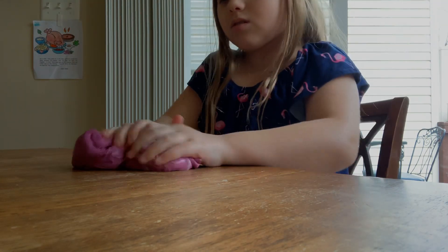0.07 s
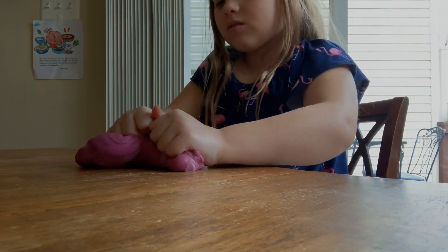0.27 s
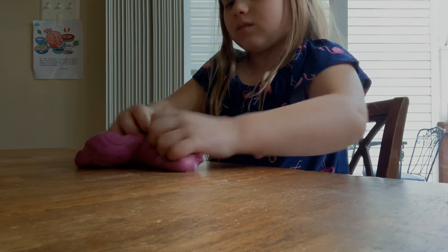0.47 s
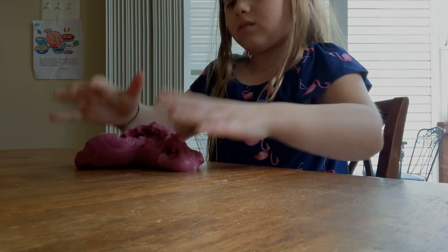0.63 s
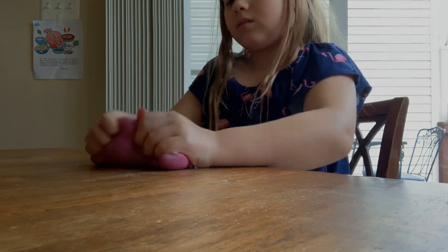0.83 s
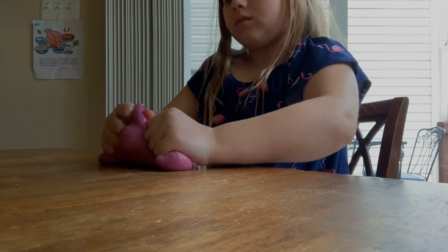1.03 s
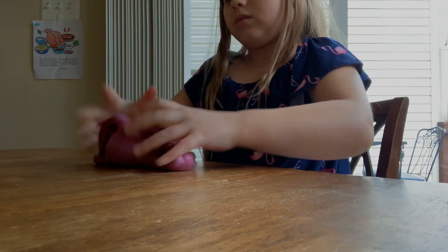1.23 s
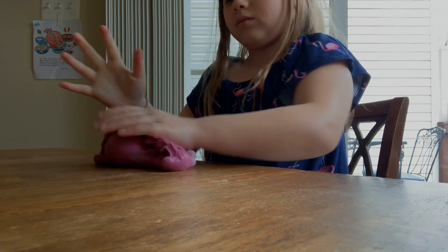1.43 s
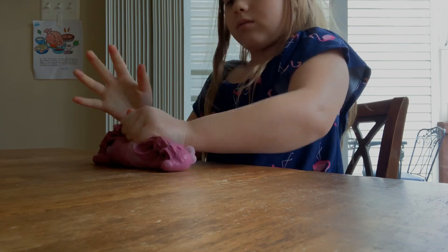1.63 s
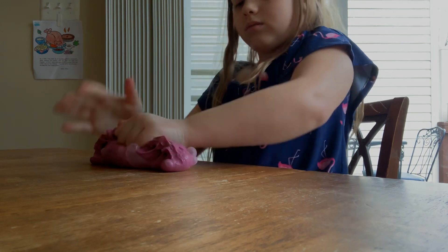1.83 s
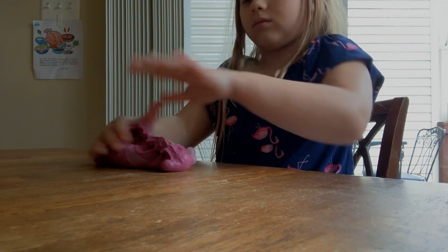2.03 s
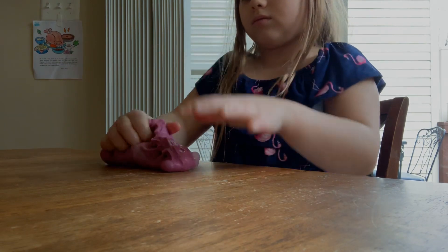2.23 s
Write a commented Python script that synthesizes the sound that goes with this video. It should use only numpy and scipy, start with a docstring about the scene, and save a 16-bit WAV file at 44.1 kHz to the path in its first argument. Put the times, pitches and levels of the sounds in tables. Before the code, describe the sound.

Air pockets burst in soft slime kneaded by hand, snapping and squelching in a quiet room

```python
"""Trapped air pockets burst as sharp pops while soft slime is folded and pressed by hand on a wooden table:
each burst is a pressure push, a cavity ringing a few cycles and a splutter of torn film.
Between them the sticky mass hisses, squelches and crackles in random grains; brief rough tones give
one tonal pop and then air squealing through slits. The furnished room answers with a bright noise tail
over its nearly steady hum; the recorder delays the lows behind the highs."""
import sys
import numpy as np
from scipy import signal
from scipy.fft import rfft, irfft, next_fast_len
from scipy.io import wavfile

SR = 44100
rng = np.random.default_rng(int(sys.argv[2]) if len(sys.argv) > 2 else 0)


def volts(x):
    """Linear amplitude factor 10**(x/20) for a level x in dB, scalar or array-like."""
    e = np.asarray(x, float) / 20
    return 10 ** e


def store_pcm(level_fs):
    """Save levels as 16-bit WAV."""
    pcm = np.round(np.clip(level_fs, -1, 1) * 32767).astype(np.int16)
    wavfile.write(sys.argv[1], SR, np.atleast_2d(pcm).T)


N = 101429


def at_hz(points, hz, index=1):
    """Reads a table column at hz, linear in log frequency."""
    points = np.array(points)
    return np.interp(np.log(np.maximum(hz, 1)), np.log(points[:, 0]), points[:, index])


def rms_one(x):
    """Scales x to rms 1."""
    return x / np.sqrt(np.mean(x ** 2) + 1e-20)


def colour(x, spectrum):
    """Filters x by the spectrum; rms 1."""
    gain = volts(at_hz(spectrum, np.fft.rfftfreq(N, 1 / SR)))
    return rms_one(irfft(rfft(x) * gain, N))


def drift(rate_hz):
    """Noise through two equal one-pole low-passes at rate_hz; rms 1."""
    r = np.exp(-2 * np.pi * rate_hz / SR)
    noise = rng.standard_normal(N + SR)
    return rms_one(signal.lfilter([1], [1, -2 * r, r * r], noise)[SR:])


def grains(per_s, spread_db):
    """Single-sample clicks at random times, of uneven size and either sign."""
    sizes = volts(spread_db * np.minimum(rng.exponential(1, N), 5))
    signs = rng.choice([-1, 1], N)
    return sizes * signs * (rng.random(N) < per_s / SR)


# Spectrum of the room hum. Each row: frequency in Hz, relative density in dB per Hz.
HUM_SPECTRUM = [(15, -53), (25, -8), (138, -7.5), (358, -16.5), (555, -8.5), (1170, -13), (2020, -29),
                (9000, -60.5), (15600, -86.5)]
HUM_RMS_DB, HUM_DRIFT_DB, HUM_DRIFT_HZ = -53.5, 0.4, 3.7


def hum():
    """Room hum: coloured noise whose level wavers slightly."""
    level_db = HUM_RMS_DB + HUM_DRIFT_DB * drift(HUM_DRIFT_HZ)
    return volts(level_db) * colour(rng.standard_normal(N), HUM_SPECTRUM)


# Room tail. Each row: frequency in Hz, 60 dB decay time in s, relative starting level in dB.
ROOM_DECAY = [(201.5, 0.88, -59), (630, 0.41, -27.5), (1440, 0.94, -21), (4000, 0.49, -10.5),
              (7000, 0.3, -8.5), (14470, 0.34, -8.5)]
ROOM_START_S, ROOM_BUILD_S = 0.003, 0.008


def room(x):
    """Diffuse reflections: half-octave noise bands, each with its own exponential decay."""
    t = np.arange(SR) / SR
    edges_hz = 90 * 2 ** np.arange(0, 7.6, 0.5)
    tail = np.zeros(SR)
    white = rng.standard_normal((2, SR))   # neighbouring bands use different noise
    for k, (low, high) in enumerate(zip(edges_hz, edges_hz[1:])):
        hz = np.sqrt(low * high)
        sos = signal.butter(2, [low, high], "band", fs=SR, output="sos")
        decay_db = at_hz(ROOM_DECAY, hz, index=2) - 60 * t / at_hz(ROOM_DECAY, hz)
        tail += volts(decay_db) * signal.sosfilt(sos, white[k % 2])
    build = np.clip((t - ROOM_START_S) / ROOM_BUILD_S, 0, 1)
    tail *= build / np.sqrt(0.05 * SR)
    return signal.fftconvolve(x, tail)[:N]


RING_CYCLES = 3.47   # the decay factor falls 60 dB in this many cycles
PUSH_TOP_HZ, PUSH_TOP_RATIO = 4000, 2.61   # push corner: the lower of Hz and ratio to the ring
SPLUTTER_DB, SPLUTTER_DECAY_S, SPLUTTER_TOP_RATIO = -9.5, 0.00086, 4.8


def burst(hz, push_db, noise):
    """Pocket burst: cavity ring plus pressure push, peak 1, then the splutter of torn film."""
    t = np.arange(len(noise)) / SR
    decay = np.log(1000) * hz / RING_CYCLES
    ring = 2 * decay * decay * t * np.exp(-decay * t) * np.cos(2 * np.pi * hz * t)
    w = 2 * np.pi * min(PUSH_TOP_HZ, PUSH_TOP_RATIO * hz)
    push = w * (w * t) ** 2 / 2 * np.exp(-w * t)
    shape = ring + volts(push_db) * push
    band_hz = [hz / 2, min(SPLUTTER_TOP_RATIO * hz, 0.45 * SR)]
    sos = signal.butter(2, band_hz, "band", fs=SR, output="sos")
    splutter = signal.sosfilt(sos, noise * np.exp(-t / SPLUTTER_DECAY_S))
    return shape / np.abs(shape).max() + volts(SPLUTTER_DB) * splutter


GRAIN_SPREAD_DB = 3.2
# Sticky hiss spectrum. Each row: frequency in Hz, relative density in dB per Hz.
HISS_SPECTRUM = [(880, -34.5), (1710, -6.5), (6690, -4.5), (16000, -18)]
HISS_GRAINS_PER_S, HISS_CLUMP_DB = 4500, 3.2


def sticky_hiss(clumps):
    """The sticky mass hisses in dense bright grains that swell with the clumps."""
    return volts(HISS_CLUMP_DB * clumps) * colour(grains(HISS_GRAINS_PER_S, GRAIN_SPREAD_DB), HISS_SPECTRUM)


# Squelch spectrum; the table top booms near 300 Hz.
# Each row: frequency in Hz, relative density in dB per Hz.
SQUELCH_SPECTRUM = [(90, -38.5), (200, -11.5), (300, 0), (700, -4), (1300, -3.5), (2500, -17), (4000, -40)]
SQUELCH_GRAINS_PER_S, SQUELCH_CLUMP_DB, SQUELCH_SWELL_HZ = 1500, 1.5, 7.0


def dull_squelch(clumps):
    """The pressed mass gives in dull grains, with the clumps and a slower swell."""
    level_db = SQUELCH_CLUMP_DB * (clumps + drift(SQUELCH_SWELL_HZ))
    return volts(level_db) * colour(grains(SQUELCH_GRAINS_PER_S, GRAIN_SPREAD_DB), SQUELCH_SPECTRUM)


CRACKLE_PER_S, CRACKLE_SPREAD_DB = 500, 3


def crackle():
    """Tiny pockets burst at random in ten ring sizes, without splutter; rms 1."""
    clicks = grains(CRACKLE_PER_S, CRACKLE_SPREAD_DB)
    dealt = rng.integers(0, 10, N)
    out = np.zeros(N)
    for k, hz in enumerate(np.geomspace(1800, 11000, num=10)):
        pocket = burst(hz, -22.0, np.zeros(128))
        out += np.convolve(clicks * (dealt == k), pocket)[:N]
    return rms_one(out)


# Kneading levels, joined by straight lines in dB, before clumping.
# Each row: time in seconds, sticky hiss level in dB, dull squelch level in dB.
KNEAD_LEVELS = [(0, -72.5, -72), (0.181, -57, -49.5), (.205, -42, -25), (0.228, -58.5, -35.5),
                (.29, -35, -28.5), (0.362, -45.5, -40.5), (0.401, -26.5, -41.5), (.425, -66, -50),
                (.437, -40, -47), (.53, -52, -55.5), (0.62, -40, -41.5), (0.65, -60, -53.5),
                (0.821, -90, -71), (0.849, -60, -61.5), (0.951, -48.5, -46), (1.055, -63.5, -44),
                (1.239, -62.5, -66), (1.278, -46, -50.5), (1.352, -46, -48), (1.392, -77, -53.5),
                (1.611, -85, -65), (1.652, -51.5, -48.5), (1.739, -48, -47), (1.97, -66, -67.5),
                (2.012, -49, -48.5), (2.05, -51.5, -57), (2.06, -38.5, -40.5), (2.075, -46.5, -47),
                (2.128, -76.5, -56), (2.25, -82, -66), (2.28, -72, -73.5)]
CLUMP_HZ, CRACKLE_VS_HISS_DB = 52, -6


def kneading():
    """Folding and pressing drive hiss, crackle and squelch; hiss and squelch share clumps."""
    s, hiss_db, squelch_db = np.transpose(KNEAD_LEVELS)
    t = np.arange(N) / SR
    hiss_db = np.interp(t, s, hiss_db)
    squelch_db = np.interp(t, s, squelch_db)
    clumps = drift(CLUMP_HZ)
    bright = sticky_hiss(clumps) + volts(CRACKLE_VS_HISS_DB) * crackle()
    return volts(hiss_db) * bright + volts(squelch_db) * dull_squelch(clumps)


# Brief tones: a 3 ms tonal pop at 0.1376 s, then air squealing through slits.
# Each row: start in seconds, length in seconds, level in dB, starting pitch in Hz,
# overtone level in dB against the fundamental.
BRIEF_TONES = [(0.1376, .003, -23, 1400, -35.5), (0.201, 0.019, -28, 3160, -11),
               (0.943, 0.0083, -33, 2586, -0.5), (1.734, 0.012, -35, 751, -16)]
TONE_SAG, TONE_ROUGH_RAD, TONE_FLUTTER_HZ = 0.1, 0.8, 400   # sag: fraction of pitch lost


def brief_tones():
    """A tonal pop, then slit squeals: tones with an octave overtone, sagging pitch, rough phase."""
    out, t = np.zeros(N), np.arange(N) / SR
    flutter = drift(TONE_FLUTTER_HZ)
    for s, length, db, hz, overtone_db in BRIEF_TONES:
        u = np.clip((t - s) / length, 0, 1)
        cycles = hz * length * (u - TONE_SAG * u * u / 2)
        phase = 2 * np.pi * cycles + TONE_ROUGH_RAD * flutter
        envelope = np.sqrt(np.sin(np.pi * u) + 1e-12) * (u < 1)
        tone = np.sin(phase) + volts(overtone_db) * np.sin(2 * phase)
        out += volts(db) * envelope * tone
    return out


# Large air pockets. Each row: start in seconds, level in dB before POP_GAIN_DB, ring in Hz,
# low push in dB against the ring.
POCKET_POPS = [(0.1074, -14.5, 2030, 0.5), (0.1938, -15, 1190, 2), (0.2007, -14.5, 3100, -12),
               (0.2008, -11.5, 950, -4.5), (0.2329, -16, 1030, -8), (0.2389, -8, 3680, -11),
               (0.2498, -5, 1180, 11.5), (0.2528, -6.5, 4980.0, -1.5), (0.2544, 2.5, 1180, 12),
               (0.256, -15.5, 7000, -39.5), (0.2669, -0.5, 9100, -12.5), (0.2683, -3, 8620.0, -3.5),
               (0.272, -23, 6000, -23.5), (0.2864, -15.5, 4500, 1.5), (0.2882, -16, 3000, -7),
               (0.2931, -11, 1030, 3.5), (0.304, -10.5, 5000, -2), (0.33, -20.5, 7500, -28),
               (0.3335, -28.5, 2800, -13.5), (0.3436, -14, 6600, -29.5), (0.3465, -24, 4000, -10.5),
               (0.3549, -3.5, 4950, -6.5), (0.3833, -5.5, 6100, -4.5), (0.4037, -7.5, 5800, -29.5),
               (0.4211, 1, 9970, -17), (0.4341, -12, 11100, -25), (0.6161, -29, 4750, -10),
               (0.6274, -26, 4870, -34), (0.8799, -24, 2370, 7), (0.9056, -28, 10590.0, 1),
               (0.915, -24.5, 8700, -16.5), (0.9215, -22, 3950, 0.5), (0.9236, -12.5, 9300, -18),
               (0.9377, -27.5, 4130, -30), (0.9553, -20.5, 2420, 0.5), (0.9582, -23, 2880.0, -17.5),
               (0.9754, -24.5, 900, 7), (0.9776, -8, 8000, -17), (0.9889, -21, 6700, -1),
               (1.0057, -26.5, 2350.0, -2), (1.0101, -25.5, 4500, 3), (1.0297, -20.5, 4480, -13.5),
               (1.0338, -5, 9230, -2), (1.041, -7, 12850, -4), (1.0432, -17.5, 3580, -15),
               (1.0511, -22.5, 2780, -33), (1.0714, -25.5, 5500, -5.5), (1.1167, -25, 7020.0, -15),
               (1.1317, -9, 6930, -15.5), (1.2792, -39, 1500, 9), (1.6349, -20, 1176, 2),
               (1.6365, -26.5, 4330, -5), (1.6495, -18.5, 5500, -17.5), (1.6595, -7.5, 5240, -10.5),
               (1.6844, -19, 5760, -29), (1.7077, -3.5, 6760, -13), (1.7356, -21, 8550, -27),
               (1.7652, -29.5, 4500, -17.5), (1.769, -20.5, 7240, -12.5), (1.7843, -25.5, 2400, 4),
               (1.8176, -18.5, 5860, -24), (1.846, -15, 5440, -26), (1.8873, -20.5, 6000, -19),
               (2.0586, -27.5, 4000, -4.5), (2.0608, -34, 2200, -2.5), (2.0724, -35, 1200, 2),
               (2.263, -29, 6050, 0)]
POP_GAIN_DB = 4.5
SMALL_SOURCE_HZ = 260   # high-pass corner: the lump is too small to radiate the lows


def pops():
    """Large pockets, one burst each, with the lows of a small radiator cut."""
    out = np.zeros(N + 512)
    noise = rng.standard_normal((len(POCKET_POPS), 512))
    for (s, db, hz, push_db), puff in zip(POCKET_POPS, noise):
        i = int(s * SR)
        out[i:i + 512] += volts(db + POP_GAIN_DB) * burst(hz, push_db, puff)
    sos = signal.butter(3, SMALL_SOURCE_HZ, "high", fs=SR, output="sos")
    return signal.sosfilt(sos, out[:N])


def scene():
    """Slime, its room tail and the hum, in one channel."""
    slime = pops() + brief_tones() + kneading()
    return (slime + room(slime) + hum())[None]


LAG_CYCLES, LAG_TOP_HZ = 1.1, 20000   # phase lag is zero at LAG_TOP_HZ


def lag_lows(x):
    """All-pass: each frequency above 50 Hz comes LAG_CYCLES of its own cycles late."""
    size = next_fast_len(N + SR // 2)
    hz = np.maximum(np.fft.rfftfreq(size, 1 / SR), 50)
    lag = np.exp(-2j * np.pi * LAG_CYCLES * np.log(hz / LAG_TOP_HZ))
    return irfft(rfft(x, size) * lag, size)


# Microphone response. Each row: frequency in Hz, gain in dB.
MICROPHONE_RESPONSE = [(20, -28), (60, 0), (7700, -1), (8300, -4.5), (15800, -6), (16200, -22.5),
                       (17000, -48)]


def microphone(x):
    """Microphone colour: a zero-phase gain over frequency."""
    size = x.shape[-1]
    gain = volts(at_hz(MICROPHONE_RESPONSE, np.fft.rfftfreq(size, 1 / SR)))
    return irfft(rfft(x) * gain, size)


def top_cut(x):
    """Nothing passes above the cut-off."""
    return signal.sosfilt(signal.butter(12, 16990, fs=SR, output="sos"), x)


OVERLOAD = 1.02   # clipping amplitude


def record(dry):
    """Lows lag, peaks beyond OVERLOAD clip, the microphone colours the whole."""
    x = np.clip(lag_lows(dry), -OVERLOAD, OVERLOAD)
    mix = microphone(x)[:, :N]
    return top_cut(mix)


dry = scene()
out = record(dry)
store_pcm(out)
```